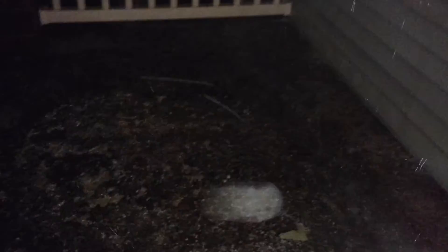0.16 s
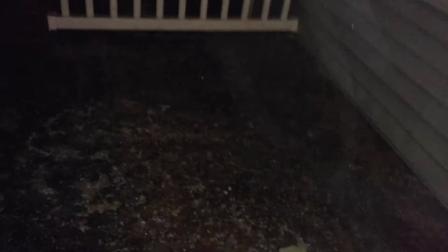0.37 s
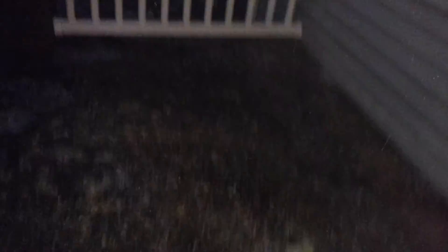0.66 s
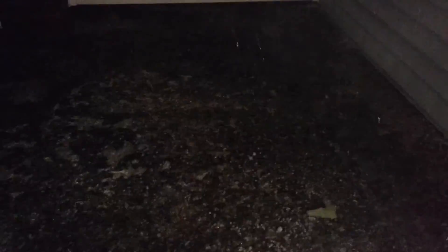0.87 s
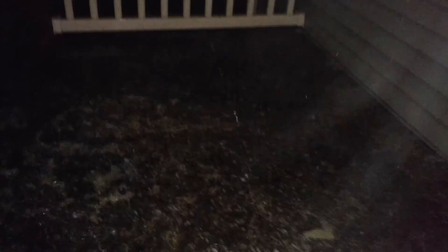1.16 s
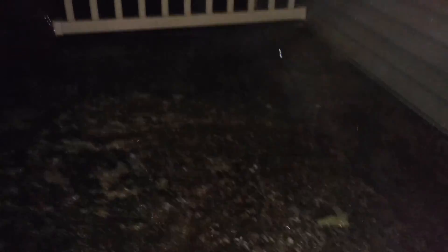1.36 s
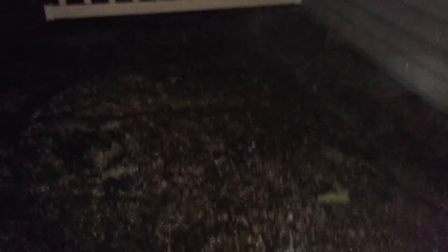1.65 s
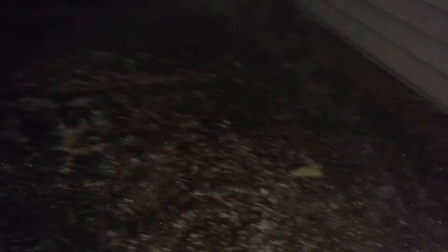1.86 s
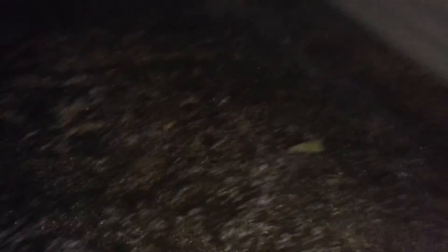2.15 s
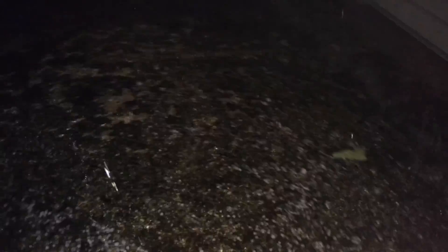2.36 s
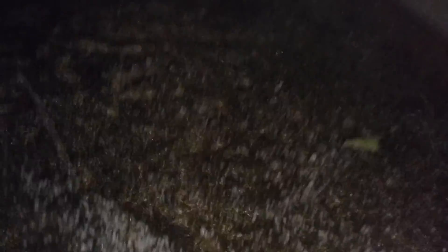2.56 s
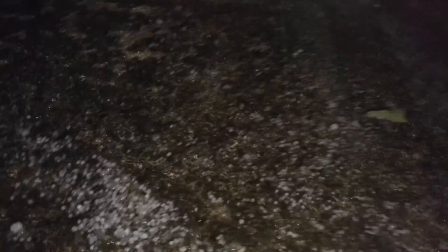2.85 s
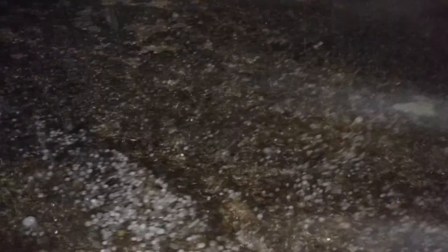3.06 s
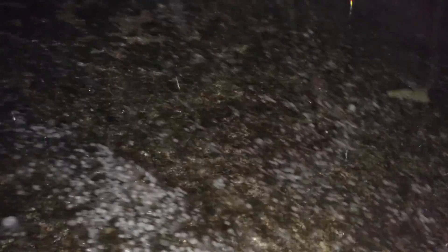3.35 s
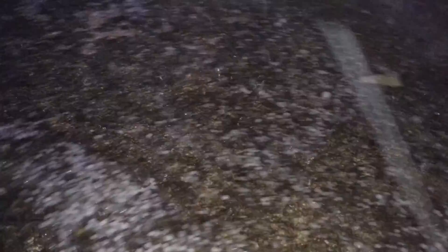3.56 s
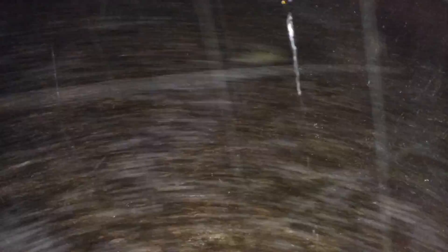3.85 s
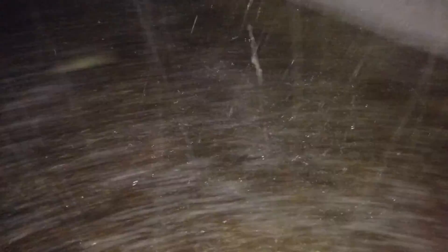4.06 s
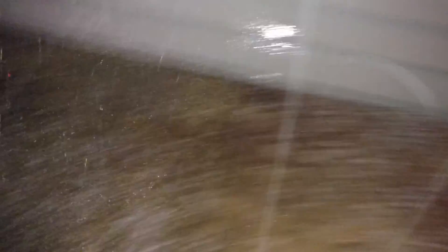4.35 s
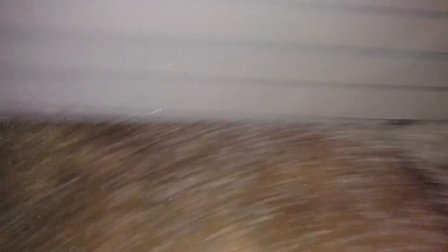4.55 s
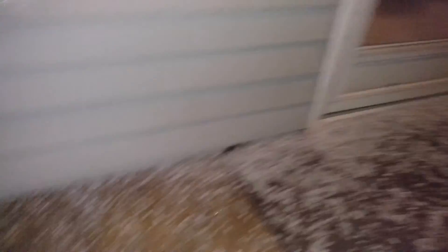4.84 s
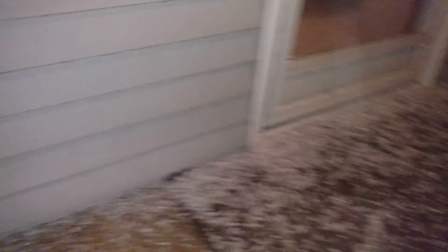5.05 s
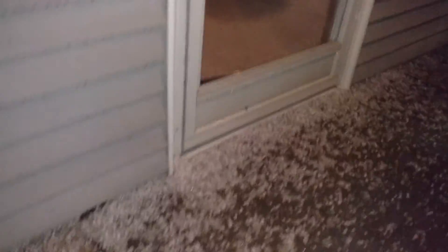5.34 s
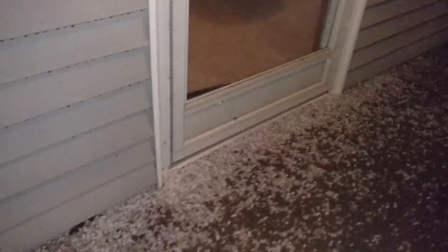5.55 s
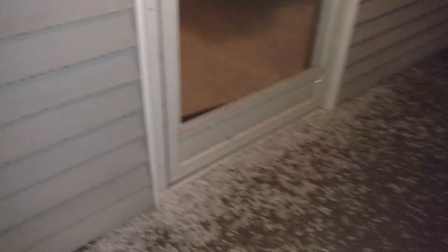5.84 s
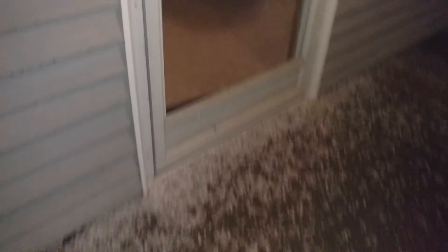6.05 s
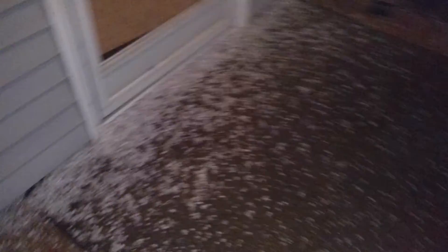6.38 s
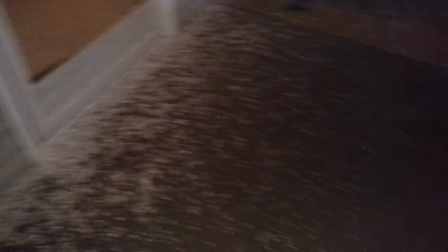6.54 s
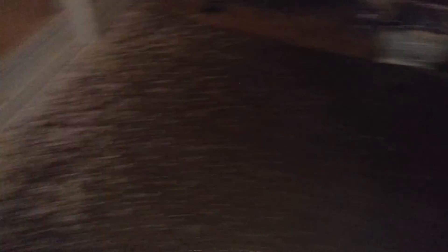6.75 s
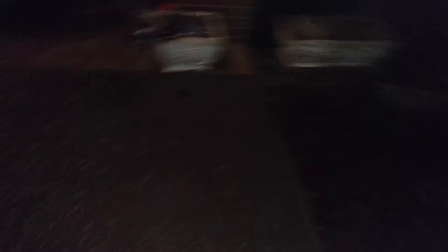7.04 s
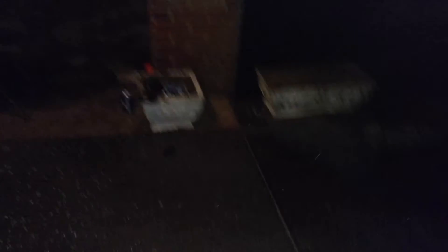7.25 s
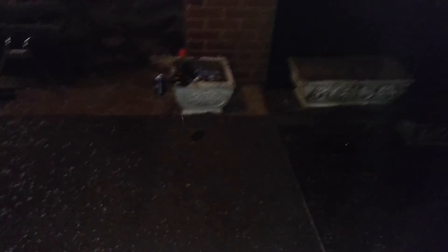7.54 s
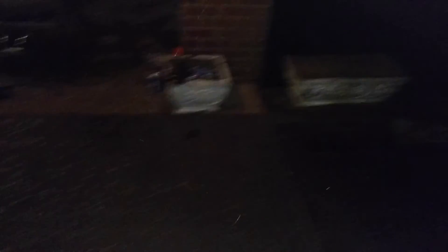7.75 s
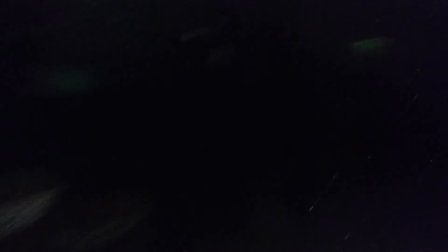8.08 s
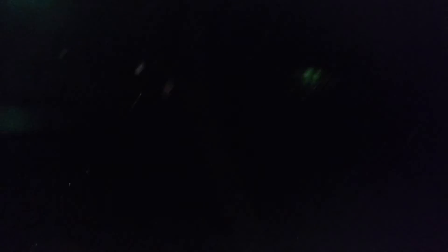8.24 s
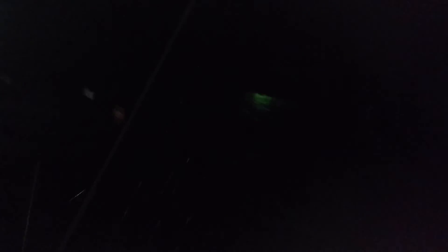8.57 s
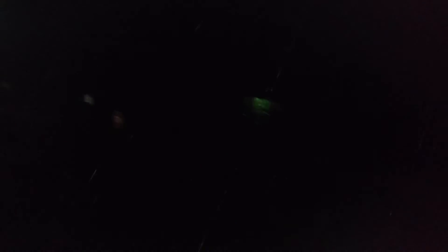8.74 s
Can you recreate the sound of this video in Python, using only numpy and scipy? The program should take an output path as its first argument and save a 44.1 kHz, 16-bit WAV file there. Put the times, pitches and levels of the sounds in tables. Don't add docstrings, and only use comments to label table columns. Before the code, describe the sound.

From 0 s a dense, gritty hiss of hail and rain on wet ground fills the stereo field, bright and grainy, made of countless tiny impacts with fine spray on top. Crisp close ticks scatter throughout, including stronger ones near 0.5, 0.95, 2.1 and 4.65 s, with faint hollow knocks between. Small flurries make the wash flutter, notably near 2.9 s; levels dip briefly around 1.8 s. From about 4.8 s the fall is heavier, with low roof rumble swelling near 5.7 and strongest at 6.2 s. A loud hollow panel knock lands at 6.03 s. As the phone turns, walls and roofs drum more fully. Plastic tubs hum low in bursts around 7.0-7.4 and 7.8-8.1 s, with faint higher lid resonance and clustered knocks near 7.9-8.3 s. Gain ducks at 8.1 s, then recovers; heavy hail continues to the end, about 9 s, without fading.

```python
import sys
import numpy as np
from scipy import signal
from scipy.fft import rfft, irfft, next_fast_len
from scipy.io import wavfile
from scipy.ndimage import uniform_filter1d

SR = 44100
rng = np.random.default_rng(int(sys.argv[2]) if len(sys.argv) > 2 else 0)


def int16_out(signal):
    q = np.round(np.clip(np.atleast_2d(signal).T, -1, 1) * 32767)
    wavfile.write(sys.argv[1], SR, q.astype(np.int16))


def magnitude_from_level(level_db):
    exponent = np.asarray(level_db, float) / 20
    return 10 ** exponent


N = 392931

# time in seconds, fall level in dB, facing roofs (0-1).
STORM = [(0.0, -36, 0.5), (0.6, -35, 0.4), (0.99, -35, 0.17), (1.45, -32.5, 0.24), (1.78, -35.5, 0.03),
         (2.3, -34.5, 0.13), (3.0, -35.5, 0.14), (3.6, -32, 0), (4.05, -35, 0.05), (4.8, -31.5, .1),
         (5.55, -32, 0.31), (6.0, -30.5, 0.38), (6.32, -34, 0.34), (6.75, -31, 0.68), (7.05, -31.5, 0.98),
         (7.6, -29, 0.73), (8.45, -33.5, 0.99), (8.91, -30, 0.95)]
# start in seconds, peak in dB, ring in Hz, click re peak in dB.
TICKS = [(0.2248, -25, 3670, -13), (0.2897, -23.5, 3760, -11), (0.4694, -20.5, 6070, -18),
         (0.6938, -28, 3800, -8), (0.9492, -18.5, 3580, -16), (1.685, -21, 6110, -5),
         (1.7679, -25, 3750, -13), (2.1238, -20, 3950, -13), (2.5165, -21, 6460, -16),
         (2.5783, -20.5, 3650, -9), (3.0345, -22.5, 3900, -1), (3.1067, -27, 3860, -15),
         (3.2725, -21, 3780, -26), (3.4548, -32, 3400, -13), (3.5294, -25, 3380, -11),
         (3.6086, -20.5, 3770, -13), (3.6286, -20, 3600, -13), (3.6614, -21, 3310, -13),
         (4.1435, -23, 3860, -10), (4.5087, -25, 3760, -13), (4.6526, -17.5, 3240, -13),
         (4.8888, -30, 3680, -31), (4.9656, -20, 3600, -13), (5.0424, -24, 3260, -13),
         (5.9636, -21, 3500, -10), (6.0192, -24, 3910, -13), (6.3914, -26, 4100, -13),
         (6.4064, -19.5, 3730, -13), (7.0963, -23, 3670, -21), (7.9508, -18.5, 3310, -13)]
# start in seconds, peak in dB, ring in Hz.
KNOCKS = [(0.144, -26.5, 1900), (0.605, -32, 1006), (1.693, -32.5, 794), (2.312, -28, 784),
          (3.133, -34, 990), (3.369, -31.5, 944), (3.745, -29.5, 1570), (3.845, -31, 894),
          (4.006, -33, 813), (4.933, -28.5, 756), (5.329, -31, 790), (5.793, -29, 1600), (6.02, -25, 820),
          (6.028, -16, 1835), (6.156, -27, 820), (6.192, -31, 804), (7.112, -26.5, 937), (7.894, -25, 1150),
          (7.917, -22, 900), (8.054, -22, 885), (8.089, -25, 870), (8.3, -23.5, 1080), (8.679, -27, 950)]
# frequency in Hz, density in dB per Hz.
HISS_SPECTRUM = [(700, -9), (1300, -12.5), (1900, -8), (3200, 0.5), (4500, 2), (5800, 2), (7100, -1.5),
                 (8400, -3), (10000, -17), (13000, -19.5), (15200, -21.5)]
# frequency in Hz, density in dB per Hz.
SPRAY_SPECTRUM = [(6000, -20), (8500, -7.5), (9700, 2), (11000, 0.5), (12300, -6.5), (13600, -19),
                  (15000, -13), (16500, -6.5)]
# frequency in Hz, density in dB per Hz.
WALL_SPECTRUM = [(250, -16.5), (450, -3), (700, 0.5), (900, -0.5), (1150, -2.5), (1500, -8), (2200, -3.5),
                 (4000, -17)]
# frequency in Hz, density in dB per Hz.
ROOF_SPECTRUM = [(20, -49), (60, -4.5), (120, 1.5), (180, 2.5), (250, -0.5), (350, -5), (500, -11.5),
                 (900, -41)]
# frequency in Hz, width in Hz, level in dB.
TUB_MODES = [(245.7, 18, 8.5), (400, 25, -2.5)]
# frequency in Hz, width in Hz, level in dB.
LID_MODES = [(857, 26, 11), (1150, 107, 5.5)]
# start in seconds, hold in seconds, level in dB.
TUB_VOLLEYS = [
    (0.456, 0.22, -48.5),
    (6.99, 0.072, -27.5),
    (7.15, 0.043, -25.5),
    (7.264, 0.17, -31),
    (7.779, 0.032, -26.5),
    (7.96, 0.14, -33),
]
# start in seconds, hold in seconds, level in dB.
LID_VOLLEYS = [
    (6.5, 0.27, -50),
    (7.2, 0.44, -43),
    (7.68, 0.13, -44),
    (7.89, 0.22, -44),
    (8.66, 0.24, -52),
]
# centre in seconds, level change in dB.
FLURRIES = [(0.24, 2), (0.5, 0.5), (0.96, 1), (1.3, -1.5), (2.14, 2), (2.4, 1), (2.92, 3.5), (3.14, 2),
            (3.62, -2), (3.85, 1.5), (4.17, 1.5), (4.42, 0), (4.6, 1.5), (4.95, 0), (5.14, -3), (5.32, 1),
            (6.03, 0.5), (6.5, 2), (6.77, 2), (7.3, 1), (8.05, 2), (8.25, 1.5)]
# centre in seconds, level change in dB.
ROOF_SWELLS = [
    (4.55, 3.4),
    (5.65, 2.8),
    (6.2, 6.3),
    (6.62, 2.6),
]
# start in seconds, drop in dB.
GAIN_TRIPS = [
    (0.999, 3),
    (1.787, 6),
    (3.194, 3),
    (3.674, 2),
    (5.608, 4),
    (6.069, 0.5),
    (8.11, 5.5),
]
# frequency in Hz, correlation (-1 to 1).
PORT_LIKENESS = [(30, .6), (70, .66), (130, .82), (250, .89), (500, .8), (900, .5), (1150, .35),
                 (1600, -.35), (2050, -.4), (2300, -.86), (2720, -.86), (3050, -.1), (12500, 0),
                 (13100, -.4), (14700, .15)]
# frequency in Hz, front over rear in dB.
FRONT_OVER_REAR = [(300, -3), (2500, 11), (4500, 2), (8000, 6), (15000, 7)]
# frequency in Hz, share of other port removed, extra lag in radians.
STEERING = [(100, 0.91, 0.039), (1290, 0.87, 0.16), (2400, 0.97, 0.22), (3850, 0.9, 0.15), (5200, 0.57, 0),
            (8040, 0.52, 0), (10500, 0.5, -.3), (12000, 0.62, -.35), (13200, 0.62, -.35), (14300, 0.7, 0)]

# (dB facing open ground, dB gained facing roofs)
GRIT_DB, SPRAY_DB, WALLS_DB, ROOFS_DB = (1.26, 0.1), (-9, -6.5), (-11, 11.57), (-10.5, 12.6)
GUST_DB, GUST_S = 0.12, 0.017
FLURRY_S, ROOF_SWELL_S = 0.056, 0.11
SMALL_DB, SMALL_SPREAD_DB, SMALL_CLICK_DB = -26, 2.5, -4
SMALL_LOW_HZ, SMALL_HIGH_HZ = 3100, 7300
VOLLEY_RISE_S, VOLLEY_FALL_S = 0.059, 0.07
RECOVER_S = 0.61
PORT_GAP_S, PORT_EDGE_HZ = 0.0003863, 15500
LONG = next_fast_len(N)
HZ = np.fft.rfftfreq(LONG, 1 / SR)
TIME_S = np.arange(N) / SR


def hiss():
    far = wash(patchy_db=1.0, flicker_db=0.23)
    near = grains(low_hz=1430, high_hz=15060, cycles=1.9, spread_db=2.0, count=12000)
    grit = magnitude_from_level(storm_db(GRIT_DB)) * field(HISS_SPECTRUM, far + 0.54 * near)
    spray = magnitude_from_level(storm_db(SPRAY_DB)) * field(SPRAY_SPECTRUM, far + 0.37 * near)
    gusts_db = GUST_DB * drift(GUST_S) + swell_db(TIME_S)
    return magnitude_from_level(gusts_db) * (grit + spray)


def wash(patchy_db, flicker_db):
    frames, bands = N // 64 + 5, 129
    real, imag = rng.standard_normal((2, 2, frames, bands))
    chance = rng.standard_normal((frames, bands + 1))
    patches = uniform_filter1d(chance[:, 1:], size=30, axis=0)
    patches = evened(uniform_filter1d(patches, size=10, axis=1))
    bursts = evened(uniform_filter1d(chance[:, :1], size=30, axis=0))
    z = (real + 1j * imag) * magnitude_from_level(patchy_db * patches + flicker_db * bursts)
    noise = signal.istft(z.transpose(0, 2, 1), nperseg=256, noverlap=192)[1]
    return evened(noise[:, :N])


def grains(low_hz, high_hz, cycles, spread_db, count):
    place, pitch, side, luck = rng.random((count, 4)).T[:, :, None]
    hz = low_hz * (high_hz / low_hz) ** pitch
    turns = np.linspace(0, 3, 48) * cycles * np.ones_like(hz)
    at = (place * (N - 2000) + turns / hz * SR).astype(int)
    turns = (at - at[:, :1]) * hz / SR
    size = magnitude_from_level(-spread_db * np.log(luck + 0.0066))
    size = size * np.gradient(turns, axis=1) * SR / low_hz
    ring = size * np.sin(2 * np.pi * turns) * np.exp(-turns / cycles)
    front = np.bincount(at.ravel(), (ring * np.cos(side * np.pi)).ravel(), N)
    rear = np.bincount(at.ravel(), (ring * np.sin(side * np.pi)).ravel(), N)
    return evened(np.array([front, rear]))


def ticks():
    out, t = np.zeros((2, N)), np.arange(1800) / SR
    stones = np.vstack([TICKS, small_stones(count=240)])
    chance = rng.standard_normal((len(stones), 3, len(t)))
    chip_band = signal.butter(1, [2200, 7500], "band", fs=SR)
    for (s, db, hz, click_db), (chips, other, tune) in zip(stones, chance):
        second_hz = hz * (1.23 + 0.35 * tune[0])
        ring = np.sin(2 * np.pi * hz * t) + 1.16 * np.sin(2 * np.pi * second_hz * t)
        ring = ring * np.exp(-t * hz / 3.3) * (1 - np.exp(-t / 0.00014))
        click = magnitude_from_level(click_db - 17.0) * np.sin(2 * np.pi * 11000 * t) * magnitude_from_level(-60 * t / 0.00058)
        skitter = 0.42 * signal.lfilter(*chip_band, [chips, other]) * magnitude_from_level(-60 * t / 0.074)
        port_gains = [[1], [0.5 * np.tanh(tune[1])]]
        add(out, s, magnitude_from_level(db + 5.5) * ((ring + click) * port_gains + skitter))
    return out


def small_stones(count):
    s, fall_db, facing = np.transpose(STORM)
    place, shelter, pitch, luck = rng.random((count, 4)).T
    at = place * (N / SR - 0.1)
    db = SMALL_DB + 2.05 * swell_db(at) + np.interp(at, s, fall_db) - np.mean(fall_db)
    db = db - SMALL_SPREAD_DB * np.log(luck + 0.33)
    db = db - 12 * np.interp(at, s, facing) * shelter
    hz = SMALL_LOW_HZ * (SMALL_HIGH_HZ / SMALL_LOW_HZ) ** pitch
    return np.transpose([at, db, hz, np.full(count, SMALL_CLICK_DB)])


def knocks():
    out, t = np.zeros((2, N)), np.arange(3000) / SR
    shape = (1 - np.exp(-t / 0.00086)) * magnitude_from_level(-60 * t / 0.062)
    for (s, db, hz), tune in zip(KNOCKS, rng.uniform(-0.75, 1, (len(KNOCKS), 4))):
        modes_hz = hz * (1 + 0.222 * tune[1:])
        side_modes = np.sin(2 * np.pi * np.outer(modes_hz, t)).sum(0)
        cluster = np.sin(2 * np.pi * hz * t) + 0.76 * side_modes
        port_gains = [[1], [0.39 + 0.51 * tune[0]]]
        add(out, s, magnitude_from_level(db - 6.5) * cluster * shape * port_gains)
    return out


def bins():
    out = np.zeros(N)
    for table, volleys in ((TUB_MODES, TUB_VOLLEYS), (LID_MODES, LID_VOLLEYS)):
        modes = sum(magnitude_from_level(db) / (1 + 1j * (HZ - hz) / width_hz) ** 2 for hz, width_hz, db in table)
        hits = rng.random(N) < 500 / SR
        pelt = magnitude_from_level(1.8 * rng.exponential(1, N)) * rng.standard_normal(N) * hits
        hum = evened(irfft(rfft(pelt, LONG) * modes, LONG)[:N])
        level = np.zeros(N)
        for s, hold_s, db in volleys:
            corners_s = [s - VOLLEY_RISE_S, s, s + hold_s, s + hold_s + VOLLEY_FALL_S]
            level += magnitude_from_level(db) * np.interp(TIME_S, corners_s, [0, 1, 1, 0])
        out += level * hum
    return magnitude_from_level(0.5) * out


def roar():
    thuds = grains(low_hz=486, high_hz=1840, cycles=3.8, spread_db=6.0, count=3000)
    walls = field(WALL_SPECTRUM, rng.standard_normal((2, N)) + 0.36 * thuds)
    roofs = field(ROOF_SPECTRUM, rng.standard_normal((2, N)))
    roofs_db = storm_db(ROOFS_DB) + swell_db(TIME_S, ROOF_SWELLS, ROOF_SWELL_S)
    return magnitude_from_level(storm_db(WALLS_DB)) * walls + magnitude_from_level(roofs_db) * roofs


def storm_db(layer_db):
    s, fall_db, facing = np.transpose(STORM)
    return np.interp(TIME_S, s, fall_db + layer_db[0] + layer_db[1] * facing)


def swell_db(t, swells=FLURRIES, width_s=FLURRY_S):
    return sum(db * np.exp(-((t - s) / width_s) ** 2) for s, db in swells)


def drift(smooth_s):
    size = round(smooth_s * SR)
    return evened(uniform_filter1d(uniform_filter1d(rng.standard_normal(N), size), size))


def field(spectrum, drive):
    front, other = rfft(drive, LONG)
    same = np.clip(read(PORT_LIKENESS), -1, 1)
    rear = same * front + np.sqrt(1 - same ** 2) * other
    ports = np.array([front, rear]) * magnitude_from_level(read(spectrum))
    return evened(irfft(ports, LONG)[:, :N])


def read(points, column=1):
    points = np.array(points)
    return np.interp(np.log(HZ + 1), np.log(points[:, 0]), points[:, column])


def evened(x):
    return x / np.sqrt(np.mean(x ** 2) + 1e-20)


def add(mix, s, sound):
    part = mix[:, round(s * SR):][:, :sound.shape[1]]
    part += sound[:, :part.shape[1]]


def scene():
    return hiss() + roar() + bins() + ticks() + knocks()


def gain_control():
    drop_db = np.zeros(N)
    for s, db in GAIN_TRIPS:
        drop_db += db * (TIME_S > s) * np.exp(-abs(TIME_S - s) / RECOVER_S)
    return magnitude_from_level(-drop_db)


def steer(dry):
    shading = magnitude_from_level(np.outer([0.5, -0.5], read(FRONT_OVER_REAR)))
    ports = rfft(dry * gain_control(), LONG) * shading * (HZ < PORT_EDGE_HZ)
    lag_rad = 2 * np.pi * HZ * PORT_GAP_S + read(STEERING, column=2)
    late = read(STEERING) * np.exp(-1j * lag_rad) * ports[::-1]
    steady = irfft(ports - late, LONG)[:, :N]
    late = late * HZ ** 2 / (HZ ** 2 + 900 ** 2)
    deeper = irfft(late, LONG)[:, :N]
    shifted = irfft(1j * late, LONG)[:, :N]
    return steady + 0.26 * drift(smooth_s=0.07) * deeper + 0.21 * drift(smooth_s=0.017) * shifted


def roll_off(x):
    return signal.sosfilt(signal.butter(12, 16220, fs=SR, output="sos"), x)


def record(dry):
    return roll_off(steer(dry))


dry = scene()
out = record(dry)
int16_out(out)
```